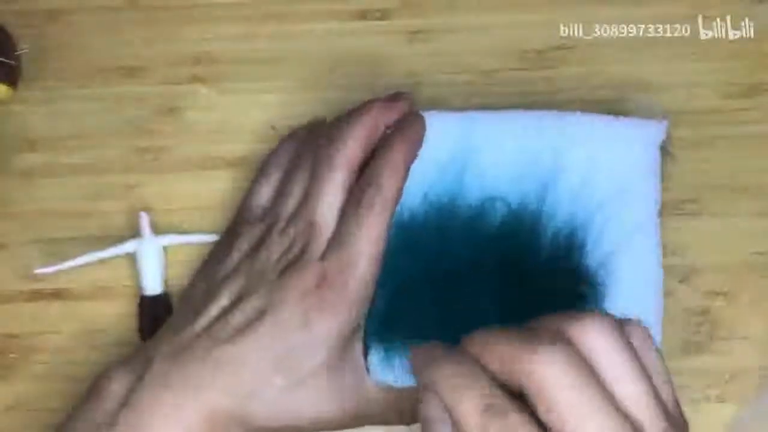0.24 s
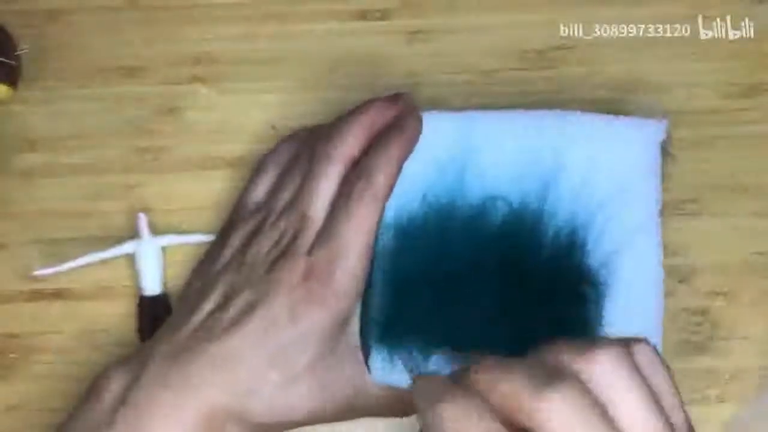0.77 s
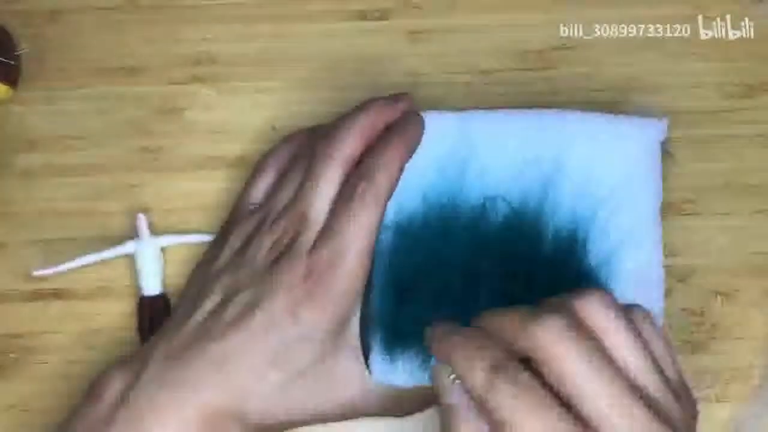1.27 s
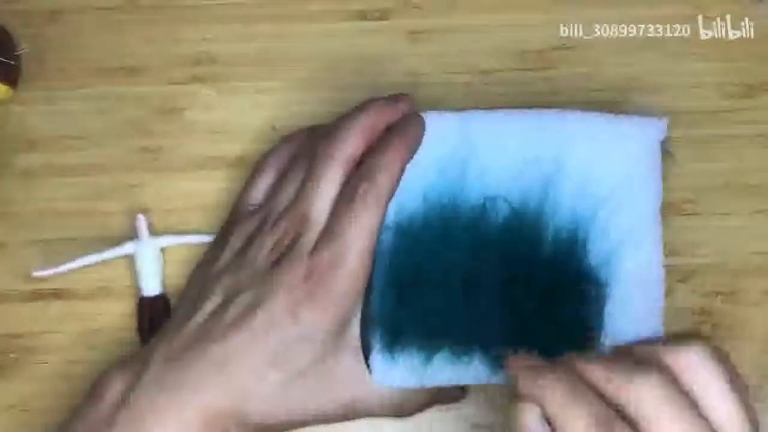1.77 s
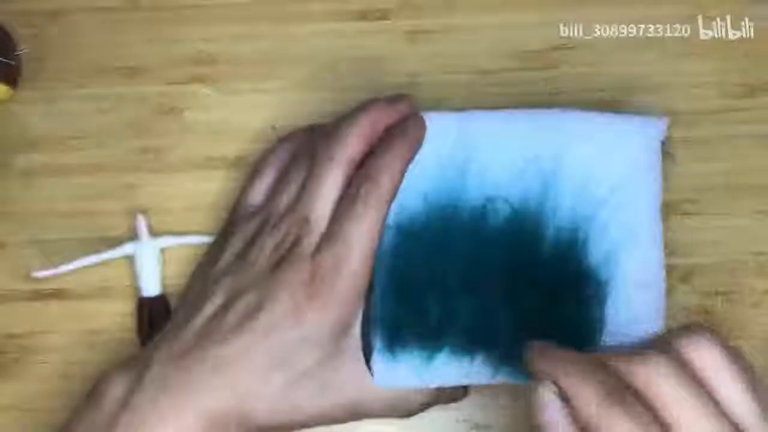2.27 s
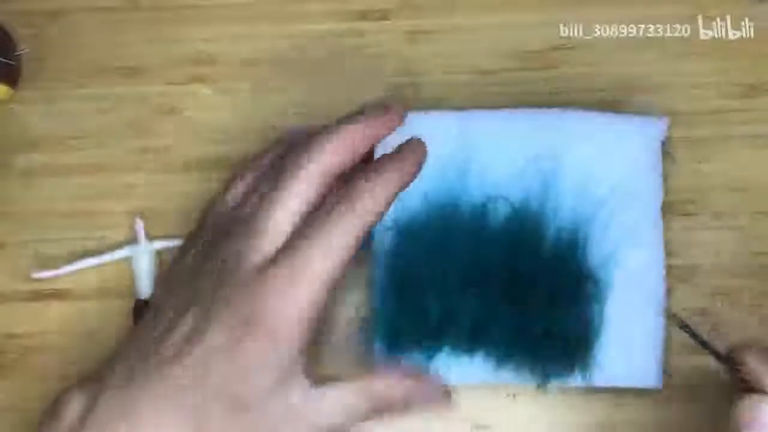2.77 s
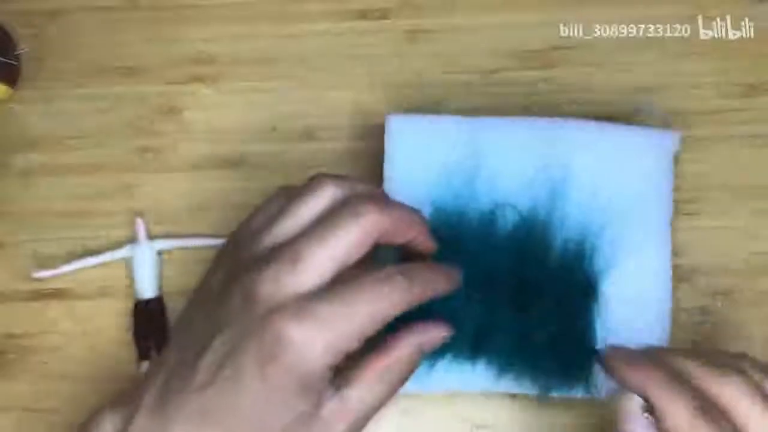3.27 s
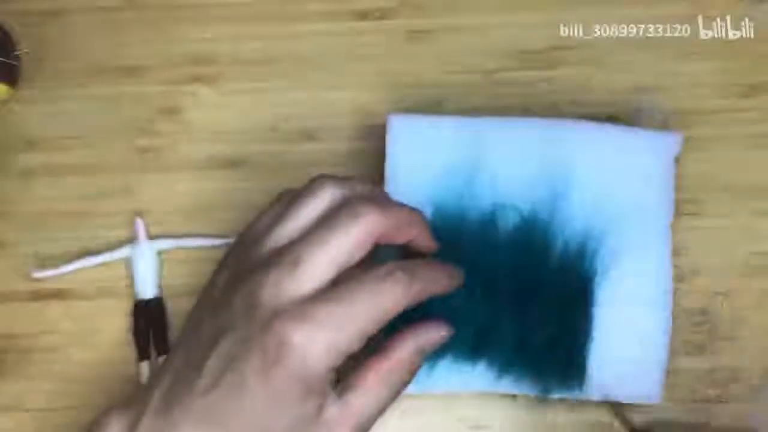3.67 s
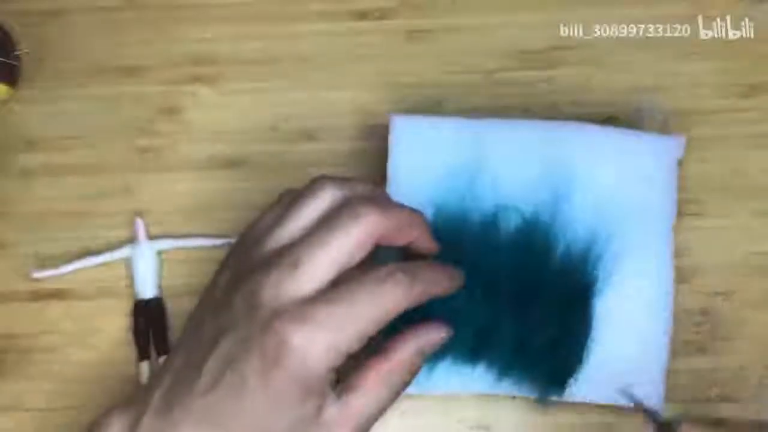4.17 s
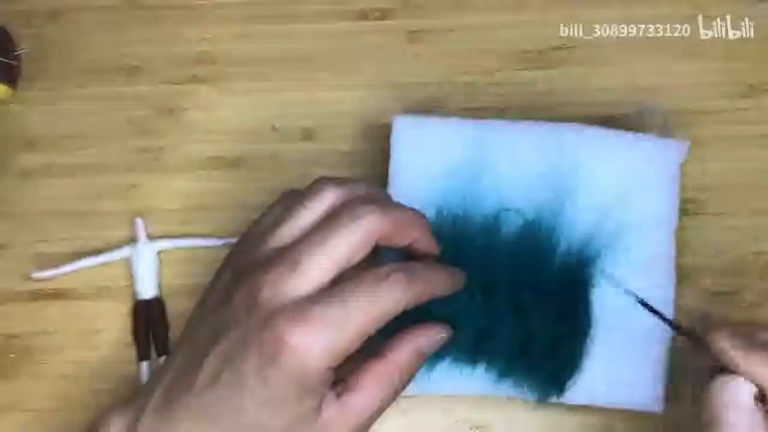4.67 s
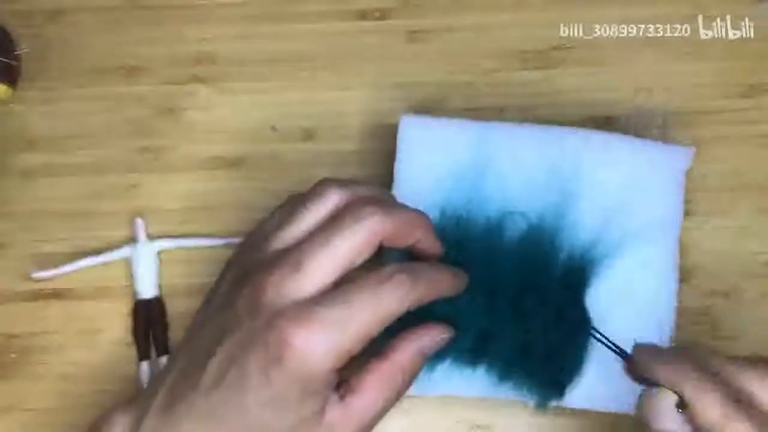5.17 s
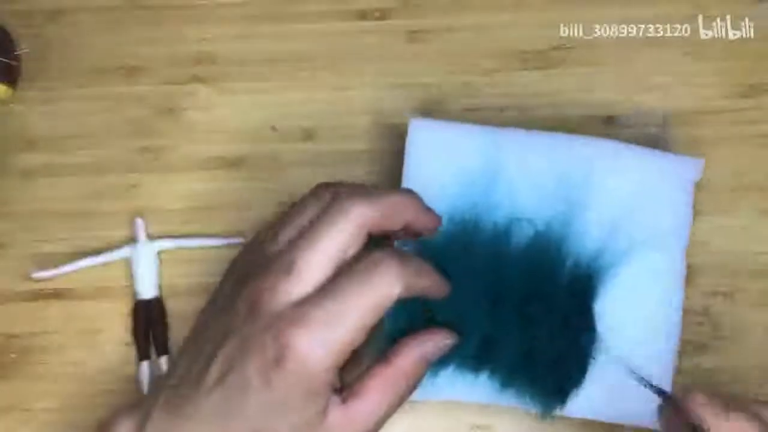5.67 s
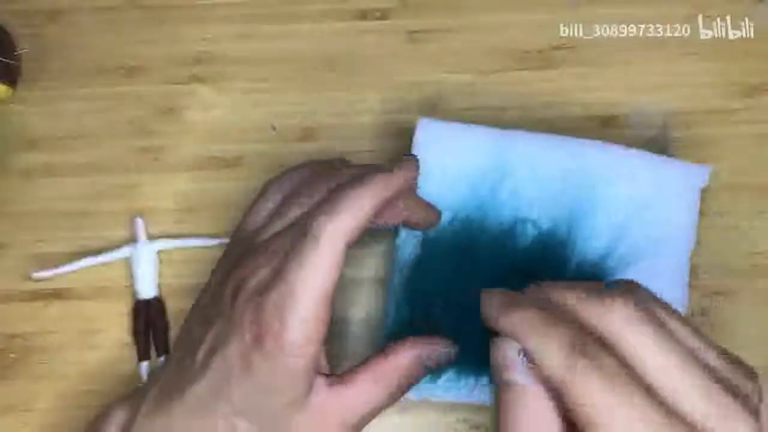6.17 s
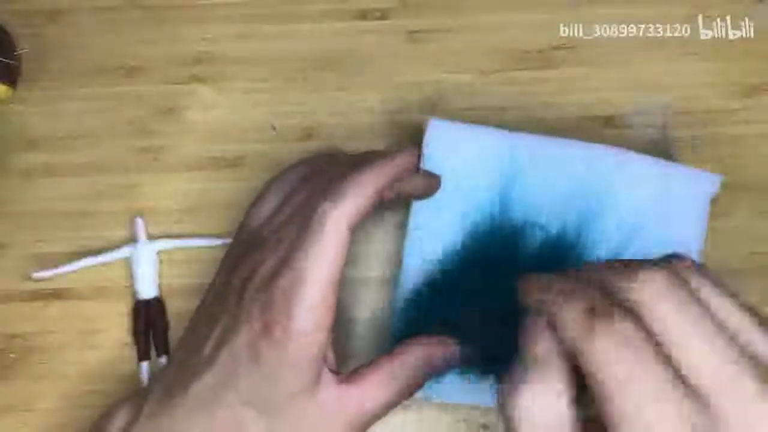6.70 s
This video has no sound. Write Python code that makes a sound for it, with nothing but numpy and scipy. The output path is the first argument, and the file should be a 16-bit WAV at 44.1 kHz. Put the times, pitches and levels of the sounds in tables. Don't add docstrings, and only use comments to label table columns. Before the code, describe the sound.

A needle stabs loose wool on a foam pad in quick, even, crunchy pricks, with soft desk knocks and a very faint bird.

```python
import sys
import numpy as np
from scipy import signal
from scipy.fft import rfft, irfft
from scipy.io import wavfile
from scipy.ndimage import uniform_filter1d

SR = 44100
rng = np.random.default_rng(int(sys.argv[2]) if len(sys.argv) > 2 else 0)


def put_to_file(sound):
    columns = np.atleast_2d(sound).T
    safe = np.clip(columns, -1, 1)
    whole_steps = np.round(safe * 32767)
    wavfile.write(sys.argv[1], SR, whole_steps.astype(np.int16))


def field_ratio(decibels):
    return 10 ** (np.asarray(decibels, dtype=float) / 20)


N = 306054
BEFORE, SPAN = 4410, 13230

# start_s, push_length_s, push_db, pull_delay_s, pull_db
NEAR_STABS = [(0.338, 0.025, -23.5, 0.066, -40), (0.625, 0.032, -37, 0.062, -41),
              (0.803, 0.014, -29, 0.047, -39), (.95, 0.016, -31.5, 0.05, -39),
              (1.093, 0.016, -30, 0.047, -36), (1.232, 0.017, -30, .049, -39),
              (1.365, 0.024, -31.5, 0.05, -37.5), (1.507, 0.017, -32, 0.043, -40.5),
              (1.643, 0.018, -35, 0.051, -41), (1.766, 0.025, -32.5, 0.053, -39.5),
              (1.903, .023, -33.5, 0.05, -37), (2.053, 0.018, -28, 0.049, -38),
              (2.195, .015, -30.5, .047, -39)]
# start_s, push_length_s, push_db, pull_delay_s, pull_db
SIDE_STABS = [(2.748, 0.039, -47.5, 0.077, -45), (2.928, 0.02, -34.5, .051, -40),
              (3.099, 0.015, -29, 0.04, -35.5), (3.461, 0.03, -37, 0.071, -45.5),
              (3.626, 0.019, -34, 0.049, -42.5), (3.769, 0.021, -29, .06, -38),
              (3.944, 0.011, -40.5, 0.053, -43), (4.095, .013, -37.5, 0.056, -40),
              (4.244, 0.018, -34.5, 0.056, -37.5), (4.405, 0.021, -31, 0.058, -40),
              (4.556, 0.019, -30.5, 0.048, -44), (4.7, 0.02, -33, 0.047, -40.5),
              (4.844, 0.021, -34, 0.046, -46), (4.978, 0.023, -36.5, 0.053, -41.5),
              (5.119, 0.024, -34.5, 0.049, -45), (5.26, 0.025, -35.5, 0.056, -46),
              (5.466, 0.016, -33, 0.051, -42), (5.613, 0.024, -29, 0.056, -36),
              (6.014, .033, -30, 0.07, -40), (6.772, 0.028, -41.5, 0.066, -44)]
# start_s, length_s, level_db, hiss_minus_ring_db
COMBS = [
    (0.05, 0.099, -70.5, 0.5),
    (0.288, 0.061, -56, -11),
    (2.33, 0.064, -55.5, -2),
    (2.418, 0.025, -59.5, 9),
    (2.592, 0.056, -64.5, -0.5),
    (2.739, 0.011, -54, -20),
    (5.353, 0.06, -63.5, 3.5),
    (5.827, 0.048, -72, 9),
    (5.897, 0.028, -62, -1),
    (6.22, 0.19, -66.5, -5.5),
]
# time_s, centre_hz
PLACE = [(0, 1380), (.8, 1490), (1.6, 1570), (2.3, 1650), (2.75, 1590), (3.1, 1675), (3.8, 1610),
         (4.5, 2080), (4.9, 1580), (5.6, 1885), (6.9, 1459)]


def strokes():
    s, length, db, delay, pull_db = np.transpose(NEAR_STABS + SIDE_STABS)
    place_s, place_hz = np.transpose(PLACE)
    centre = np.interp(s, place_s, place_hz)
    thin_db = 9.5 * np.log2(centre / 1600)
    hard = db + 34
    tug = pull_db + 42
    slow = length - 0.02
    each = np.ones(len(s))
    push_hiss_db = -5 - 0.62 * hard - 170 * slow + thin_db
    push_swell_db = 7.5 - 0.65 * hard - 39 * slow
    pushes = [s, length, db, push_hiss_db, centre, push_swell_db, each]
    pull_length = 0.011 * field_ratio(-0.49 * tug) + 0.63 * slow
    pull_hiss_db = -7.5 - 0.85 * tug + thin_db
    pulls = [s + delay, pull_length, pull_db, pull_hiss_db, centre, 7 * each, 2.07 * each]
    combs = [(*row, np.interp(row[0], place_s, place_hz), 0, 0.77) for row in COMBS]
    return np.vstack([np.transpose(pushes), np.transpose(pulls), combs])


def stroke_envelope(length, swell_db, soft, ease):
    t = np.arange(-BEFORE, SPAN - BEFORE) / SR
    along = np.clip(t / length, 0, 1) - .5
    arch_db = 2.5 * (.5 - (2 * along) ** 2)
    grip = field_ratio(swell_db * along + arch_db)
    rise_s = 0.0027 * soft * ease
    before = np.exp(np.minimum(t, 0) / rise_s) + field_ratio(-24) * np.exp(-np.abs(t) / 0.008)
    past = np.maximum(t - length, 0)
    fall_s = 0.0047 * ease * soft ** 0.13
    after = np.exp(-past / fall_s) + field_ratio(-16) * np.exp(-past / 0.0077)
    return grip * before * after


# start_s, peak_db, ring_minus_snap_db
LOUD_SNAGS = [(.3401, -15.7, 3.2), (.3497, -22.8, 2.1), (.3546, -24.8, .5), (.6515, -29.5, -4.1),
              (.8013, -27.9, -8), (.8232, -26.1, -7.5), (.9552, -27.7, -3), (1.1015, -24.6, 3.7),
              (1.1066, -25.9, -.7), (1.2497, -18.9, -8.3), (1.3815, -24.8, -1.9), (1.3856, -22.8, -4.4),
              (1.5051, -21.4, -9.6), (1.6466, -27.5, -4.8), (1.6503, -17.8, -6.5), (1.7655, -15.2, -10.6),
              (1.7725, -23.8, -5.6), (1.7874, -24.8, -5.9), (1.791, -17.7, -6.7), (1.9029, -26.2, -8),
              (1.9105, -25.6, -7.7), (1.9246, -22.9, -2.3), (2.0583, -25.4, -.1), (2.0699, -24.2, -.3),
              (2.1943, -19.6, -8.1), (2.1998, -22.1, -5.2), (2.2138, -21.3, -9.4),
              (2.9422, -23.9, -7.5), (2.9487, -23.5, -8.1), (3.095, -21.9, -9), (3.4922, -23.6, -10.2),
              (3.634, -19.7, -10.3), (3.6457, -25.5, -9.8), (3.7747, -21.3, -7.2), (3.7916, -22.6, -8.2),
              (3.859, -30.6, -8), (4.1003, -26, -8.8), (4.2526, -19.9, -10.4), (4.4051, -25.5, -4.5),
              (4.4111, -20.6, -9), (4.4223, -21.2, -3.1), (4.7086, -23.2, -7.6), (4.8451, -19.2, -12.2),
              (5.1375, -25.5, -3), (5.2818, -24.2, -8.1), (5.473, -25.4, -3.1), (5.4876, -25.5, -5.3),
              (5.5346, -30.4, -11.9), (5.6186, -22, -4.7), (5.6281, -22.4, -3.2), (5.6395, -24.7, -4.3),
              (5.6944, -29.9, -9.3), (6.0163, -12.1, -13.8), (6.0236, -22.3, -2.3), (6.0446, -23.2, -5.9),
              (6.4357, -49.1, -18.1), (6.7802, -32.1, -3.8)]
# start_s, peak_db, ring_minus_snap_db
PULL_SNAGS = [(.3712, -32.7, -7.3), (1.534, -31.5, -8.1), (2.1039, -32.2, -9.2), (2.8405, -39.3, -4),
              (2.8674, -39.6, -1.5), (4.016, -40.2, -2.8), (4.1606, -34.8, -12.7), (4.1693, -32.5, -12.2),
              (4.3205, -39.5, -9.9), (4.478, -36.6, -1.6), (4.4804, -35.2, -5.9), (5.4264, -48.5, -12.4),
              (6.8639, -36.5, -6.4)]


def snags():
    s, length, db = np.transpose(NEAR_STABS + SIDE_STABS)[:3]
    when = rng.random(len(s))
    scatter_db = -0.5 * rng.standard_normal((2, len(s)))
    ring_db = np.full(len(s), -4.5)
    entry = [s - 0.001, -39.5 + 1.04 * (db + 34) + scatter_db[0], ring_db]
    small = [s + when * length, db + 4.5 + scatter_db[1], ring_db]
    loud = np.transpose(LOUD_SNAGS + PULL_SNAGS)
    return np.hstack([loud, entry, small])


# mode_hz, width_hz, level_db
PAD = [(790, 390, -12), (1086, 89, 0.5), (1307, 190, 0), (1600, 273, 3), (1870, 635, 3), (2680, 330, -1)]
# patch_hz, width_hz, level_db
CELLS = [(2877, 3700, -3), (4988, 690, -21.5), (8200, 830, -13), (11720, 3940, -22), (14400, 2000, -16.5)]
# frequency_hz, gain_db
FIBRE = [(300, -18.5), (1000, 3.5), (2500, -3), (3500, -1.5), (5400, 2.5), (7000, 0), (9500, -3.5),
         (12000, -1.5), (15000, -3), (16000, -0.5)]


def needle():
    modes = np.array(PAD + CELLS)
    pads = len(PAD)
    hiss, push = np.zeros(2 * N), np.zeros(2 * N)
    grip = np.zeros((len(modes), 2 * N))
    rows = strokes()
    chance = rng.standard_normal((len(rows), len(modes)))
    for (s, length, db, hiss_db, centre_hz, swell_db, ease), luck in zip(rows, chance):
        softness = field_ratio(-.6 * (db + 39.5))
        shape = stroke_envelope(length, swell_db, softness, ease) * field_ratio(db)
        at = slice(int(s * SR), int(s * SR) + SPAN)
        nearness = np.exp(-(np.log(modes[:pads, 0] / centre_hz) / 0.32) ** 2)
        share = nearness * field_ratio(2.17 * luck[:pads])
        share /= np.sqrt(np.sum(share ** 2))
        tilt = 1.6 + 0.3 * np.log2(modes[pads:, 0] / 5000)
        patch = field_ratio(hiss_db * tilt + 3.5 * luck[pads:])
        hiss[at] += shape * field_ratio(hiss_db)
        grip[:, at] += np.outer(np.append(share, patch), shape)
        push[at] += shape
    heard = slice(BEFORE, N + BEFORE)
    hiss, grip, push = hiss[heard], grip[:, heard], push[heard]
    tears = clicks(rate=2200, spread_db=2.5, hiss=.7)
    lumps = clicks(rate=770, spread_db=1.0, hiss=0.39)
    s, snag_db, ring_db = snags()
    crackle = rng.standard_normal((len(s), 48)) * np.exp(-np.arange(48) / (0.00013 * SR))
    crackle[:, 0] = 3.5 * np.sign(crackle[:, 0])
    crackle *= field_ratio(snag_db + 12.5)[:, None] / np.sqrt(np.sum(crackle ** 2, axis=1, keepdims=True))
    snaps = spikes(s[:, None] + np.arange(48) / SR, crackle)
    snag_ring = spikes(s, np.sign(crackle[:, 0]) * field_ratio(snag_db + ring_db + 10.5))
    out = colour(field_ratio(-0.5) * hiss * tears + snaps, FIBRE)
    for k, (hz, width_hz, db) in enumerate(modes):
        if k < pads:
            drive = grip[k] * (lumps + 0.52 * tears) + snag_ring
        else:
            drive = grip[k] * np.roll(tears, 997 * k)
        out += (-1) ** k * field_ratio(db - 3) * ring(drive, hz, width_hz)
    return out, push


# start_s, peak_db, deep_part_db, bright_part_db
KNOCKS = [
    (0.341, -28, -30, 3),
    (2.777, -26, -13.5, -4),
    (3.069, -27, -12, -3),
    (3.892, -38, -6, -8),
    (3.928, -34.5, -3.5, -0.5),
    (4.304, -32, -10, 5),
    (4.438, -20.5, -7, 2.5),
    (4.883, -19.5, -8.5, 7),
]
# start_s, length_s, level_db, starting_top_hz
SCUFFS = [
    (2.742, 0.05, -60, 2200),
    (2.816, 0.092, -70, 1200),
    (2.988, 0.044, -47.5, 1810),
    (3.149, 0.058, -46.5, 1900),
    (3.914, 0.088, -50.5, 1400),
    (4.472, 0.09, -62, 1180),
    (4.603, 0.089, -51, 1370),
    (4.756, 0.045, -43, 1600),
    (5.039, 0.038, -50.5, 1810),
]
# mode_hz, level_db, t60_s
DESK = [(109.04, -18, 0.035), (142.8, -9, 0.25), (209.4, -11.5, 0.23), (246, -6, 0.12), (345.6, -7, 0.038),
        (468, -6, 0.065), (612, -21, 0.011), (737, -8, 0.03), (934, -1, 0.033), (1160, -6, 0.048),
        (1180, -28, 0.0088), (1540, -8.5, 0.017), (1900, -9, 0.016), (2200, -9.5, 0.011),
        (2860, -5, 0.0023), (3400, -35, 0.0025)]


def desk(push):
    s, db, deep_db, bright_db = np.transpose(KNOCKS)
    out = np.zeros(N)
    for k, (hz, mode_db, t60) in enumerate(DESK):
        part_db = deep_db if hz < 500 else bright_db if hz > 1500 else -5
        blow = field_ratio(db + part_db - 17)
        strike = (-1) ** k * field_ratio(19.5) * spikes(s, blow) / (1 + (300 / hz) ** 2)
        rattle = field_ratio(-9) * bursts(s, blow, decay=0.0039) + field_ratio(-14.5) * bursts(s, blow, decay=0.023)
        drive = rattle + field_ratio(-40) * push / (1 + (hz / 400) ** 2)
        for start, length, scuff_db, top_hz in SCUFFS:
            at = slice(int(start * SR), int((start + length) * SR))
            u = np.linspace(0, 1, at.stop - at.start)
            slowing_hz = .9 * top_hz * (1 - .6 * u)
            dull = 1 + (np.log(hz / slowing_hz) / .75) ** 2
            drive[at] += field_ratio(scuff_db - 17) * np.sin(np.pi * u ** 1.17) / dull
        pole = np.exp(2j * np.pi * hz / SR - np.log(1000) / (t60 * SR))
        force = strike + drive * rng.standard_normal(N)
        out += field_ratio(mode_db) * signal.lfilter([1], [1, -pole], force).imag
    return out


# time_s, level_db
BRUSH = [(0, -60.5), (.75, -63), (1.24, -72), (1.93, -77), (2.28, -61), (2.42, -65.5), (2.68, -62.5),
         (2.84, -59), (3.19, -64), (3.69, -61), (3.98, -64), (4.72, -77), (4.9, -61), (5.24, -64),
         (5.89, -58.5), (6.26, -60.5), (6.75, -64.5), (6.94, -60)]


def brushing():
    s, db = np.transpose(BRUSH)
    grain = clicks(rate=4000, spread_db=-0.5, hiss=1.0)
    grain *= field_ratio(1.3 * unit(uniform_filter1d(rng.standard_normal(N), size=700)))
    soft = colour(grain, FIBRE) + field_ratio(-1) * ring(grain, 1440, 970)
    return soft * field_ratio(np.interp(np.arange(N) / SR, s, db) - 10)


# start_s, length_s, from_hz, to_hz, level_db
CHIRPS = [
    (.505, .027, 5400, 5200, -73),
    (.747, .05, 8600, 5600, -75),
    (.89, .038, 8600, 6220, -75),
    (6.245, .095, 9000, 4600, -75),
    (6.395, .075, 8600, 4300, -73),
    (6.685, .075, 9000, 4700, -74),
]


def bird():
    out = np.zeros(N)
    for s, length, from_hz, to_hz, db in CHIRPS:
        count = int(length * SR)
        u = np.arange(count) / count
        phase = 2 * np.pi * np.cumsum(from_hz + (to_hz - from_hz) * u ** .9) / SR
        flutter = .6 + .8 * unit(uniform_filter1d(rng.standard_normal(count), size=80))
        start = int(s * SR)
        out[start:start + count] += field_ratio(db) * np.sin(np.pi * u) ** 0.13 * flutter * np.sin(phase)
    return out


def room_echo(near):
    t = np.arange(SR // 2) / SR
    t60_s = 0.2
    tail = rng.standard_normal(len(t)) * field_ratio(-60 * t / t60_s) * (t > .004)
    walls = [(200, 0), (700, 4), (1300, -10), (2500, -2), (6000, -6), (15000, -9)]  # frequency_hz, gain_db
    tail = colour(np.pad(tail, (0, N)), walls)[:len(t)]
    return field_ratio(-14) * signal.fftconvolve(near, tail / np.sqrt(np.sum(tail ** 2)))[:N]


# frequency_hz, density_db
ROOM = [(15, -52), (25, -34), (45, -4.5), (70, 1.5), (108, -12), (142, -3), (177, -11.5), (358, -12),
        (831, -22.5), (902, -19), (1060, -23), (14800, -49), (16500, -48)]


def room_tone():
    return field_ratio(-64.5) * unit(colour(rng.standard_normal(N), ROOM))


def unit(x):
    return x / np.sqrt(np.mean(x ** 2))


def colour(x, points):
    hz, db = np.transpose(points)
    log_gain = np.interp(np.log(np.linspace(1, SR / 2, 2049)), np.log(hz), db) * np.log(10) / 20
    cepstrum = irfft(log_gain)
    cepstrum[1:2048] *= 2
    cepstrum[2049:] = 0
    kernel = irfft(np.exp(rfft(cepstrum)))
    return signal.fftconvolve(x, kernel / np.sqrt(np.sum(kernel ** 2)))[:N]


def ring(x, hz, width_hz):
    b, a = signal.iirpeak(hz, hz / width_hz, fs=SR)
    return signal.lfilter(b, a, x) * np.sqrt(SR / np.pi / width_hz)


def clicks(rate, spread_db, hiss):
    size_db = spread_db * np.minimum(rng.exponential(size=N), 3)
    size = field_ratio(size_db) * rng.standard_normal(N)
    tears = unit(size * (rng.random(N) < rate / SR))
    return unit(tears + hiss * rng.standard_normal(N))


def spikes(s, gain):
    out = np.zeros(N)
    np.add.at(out, np.round(np.asarray(s) * SR).astype(int), gain)
    return out


def bursts(s, gain, decay):
    return signal.lfilter([1], [1, -np.exp(-1 / (decay * SR))], spikes(s, gain))


def scene():
    stabs, push = needle()
    near = stabs + desk(push) + brushing() + bird()
    return (near + room_echo(near) + room_tone())[None]


def band_limit(x):
    return signal.sosfilt(signal.butter(12, 16790, fs=SR, output="sos"), x)


def record(dry):
    top = signal.ellip(6, .3, 27, 15250, fs=SR, output="sos")
    edge = signal.ellip(8, .3, 50, 16800, fs=SR, output="sos")
    rumble = signal.butter(4, 42, "high", fs=SR, output="sos")
    mix = signal.sosfilt(np.vstack([top, edge, rumble]), dry)
    return band_limit(mix)


dry = scene()
out = record(dry)
put_to_file(out)
```